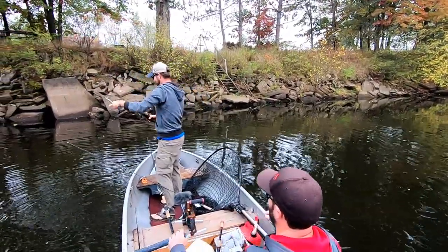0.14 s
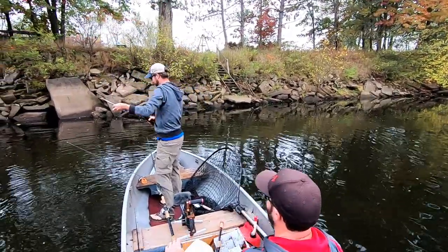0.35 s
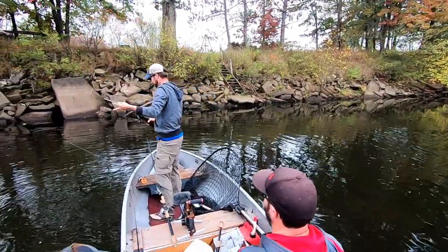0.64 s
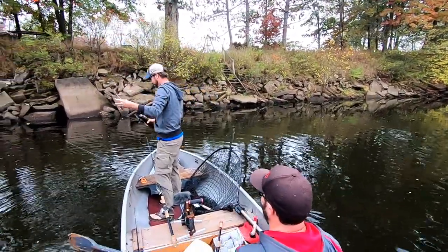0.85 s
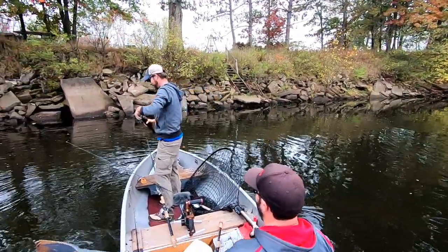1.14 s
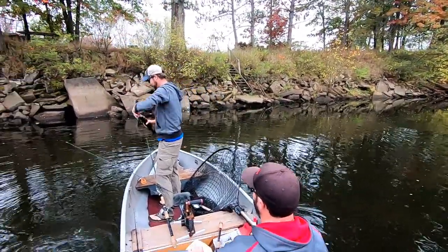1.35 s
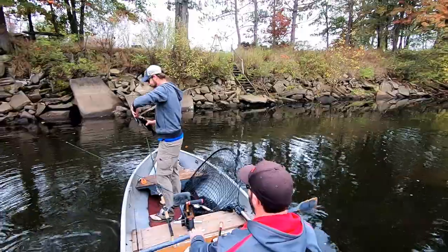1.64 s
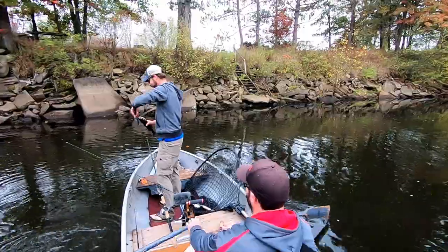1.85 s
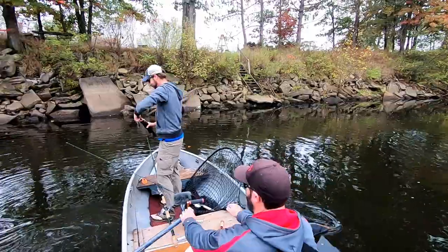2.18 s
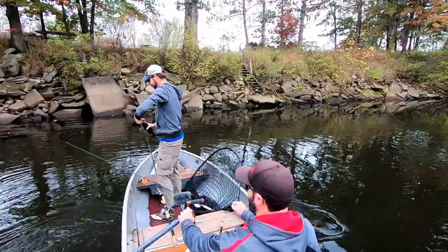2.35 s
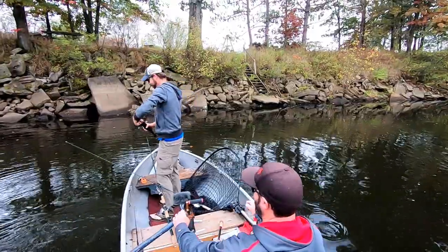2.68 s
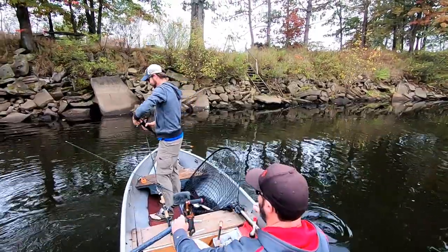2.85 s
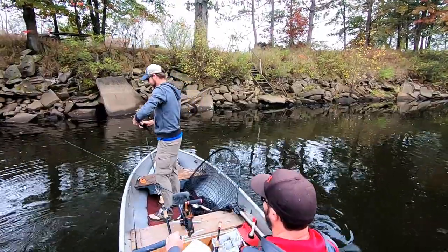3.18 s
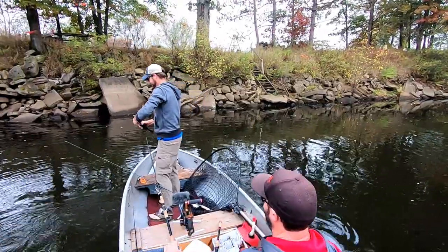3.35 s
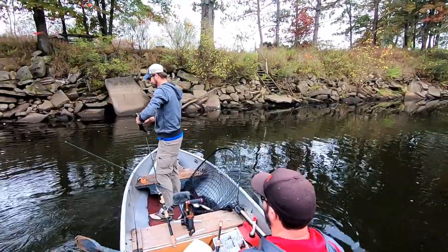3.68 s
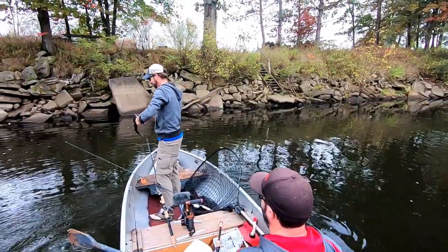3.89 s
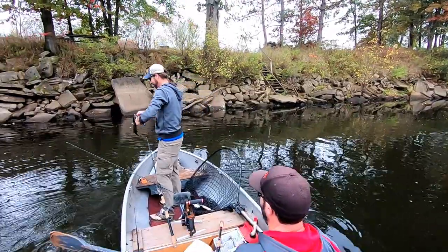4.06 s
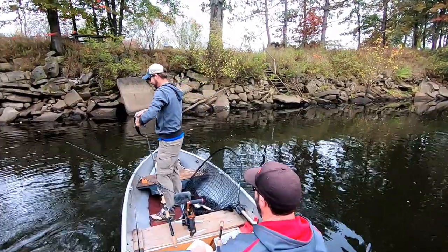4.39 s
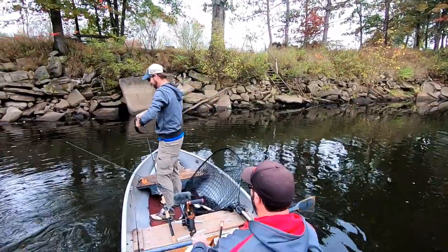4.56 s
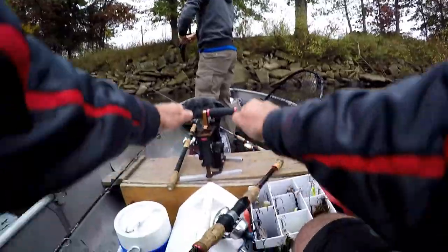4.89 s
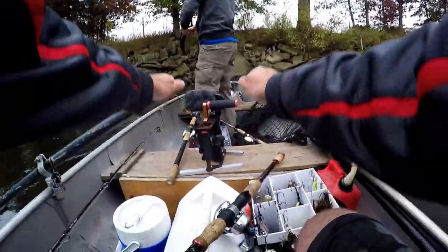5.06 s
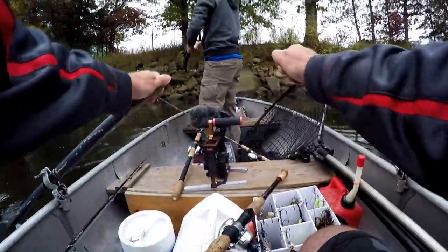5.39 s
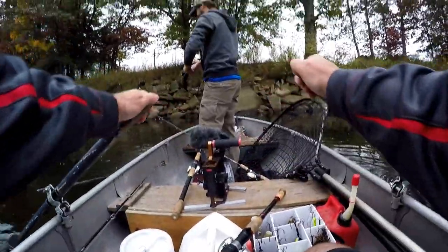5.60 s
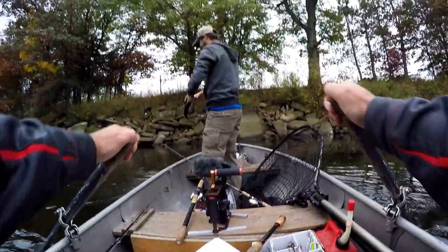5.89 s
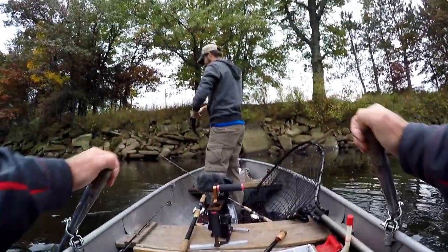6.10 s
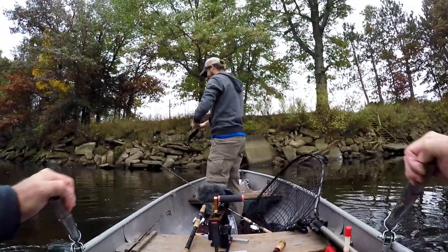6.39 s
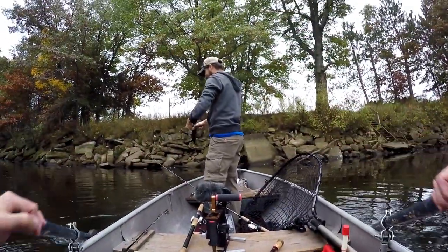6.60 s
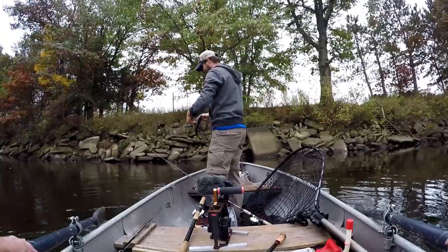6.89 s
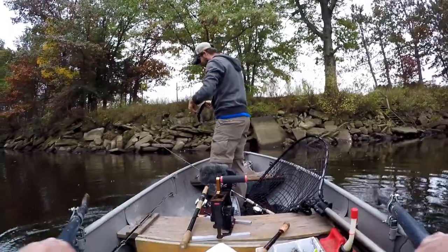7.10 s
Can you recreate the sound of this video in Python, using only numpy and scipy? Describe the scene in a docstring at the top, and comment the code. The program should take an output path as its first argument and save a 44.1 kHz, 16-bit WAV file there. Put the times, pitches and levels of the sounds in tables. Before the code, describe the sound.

A small aluminum boat is rowed on a calm river, heard close from the rower's seat with faint scatter from the bank. Low buffeting air, soft hiss and water murmur run throughout. A few watery plops lead to the first oar entry at 0.4 s, with a light splash and a cluster of hollow hull knocks that thins by 1.7 s. A jacket brushes near 2.0 and 2.4 s as thumps gather; a very loud metallic bang lands at 2.6 s, then the blades lift in quick sloshes and drip around 3 s. The second stroke splashes in at 3.4 s with knocks and chatter. Sleeves slide from 4.7 s; a strong knock at 4.9 s precedes sharp ticks and a tiny rough oarlock squeak at 5.35 s. Blades lift at 5.5 s, a thump hits at 5.7 s, drips fall around 6 s, and the third stroke enters at 6.4 s amid rustling and knocks until 7.2 s.

```python
"""A small aluminum boat is rowed on a calm river, heard from the rower's seat.
Filtered noise gives low air rumble, hiss and water murmur throughout; gliding sines drip off the blades.
At about 0.4, 3.4 and 6.4 s the blades splash in; decaying hull modes and noise make the knocks and thumps.
Noise ticks of spray and metal join in; from 2 s gated noise brushes like a jacket, and sleeves slide from 4.7 s.
The blades lift with a run of sloshes near 2.7 and 5.5 s; an oarlock squeaks in rough tones at 5.3 s."""
import sys
import numpy as np
from scipy import signal
from scipy.fft import rfft, irfft, next_fast_len
from scipy.io import wavfile
from scipy.ndimage import map_coordinates

SR = 44100
rng = np.random.default_rng(int(sys.argv[2]) if len(sys.argv) > 2 else 0)


def to_wav(s):
    """Save 16-bit WAV."""
    ch = np.atleast_2d(s).T  # columns
    pcm = np.round(np.clip(ch, -1, 1) * 32767)  # PCM
    wavfile.write(sys.argv[1], SR, pcm.astype(np.int16))


N = 319284

# Oar strokes. Each row: blades enter in seconds, time until they lift clear in seconds,
# then trims in dB for the splash, the heave on the pull and the heave on the swing.
STROKE_ROWS = [(0.42, 2.29, -6.5, -0.5, 1), (3.40, 2.14, 0.5, 0.5, -3), (6.40, 2.2, 0.5, -5, 0)]
# Hiss of the open river. Each row: time in seconds, level in dB before the hiss trim.
HISS_LEVEL = [(0.0, -68.5), (1.15, -69.5), (1.4, -67), (2.0, -65.5), (2.25, -69.5), (2.95, -66),
              (3.65, -65.5), (4.0, -71), (4.3, -70), (4.94, -64.5), (5.5, -70), (6.6, -66.5), (6.92, -71),
              (7.24, -66)]
# Colour of the hiss. Each row: frequency in Hz, relative density in dB per Hz.
HISS_COLOUR = [(180, 1.5), (300, 4.5), (384, 4), (453, -7.5), (794, -18.5), (985, -31), (1200, -7),
               (1700, -6.5), (2790, -8.5), (3450, -8), (4800, -7.5), (14000, -20.5), (15500, -24.5)]
# Colour of the low buffeting air. Each row: frequency in Hz, relative density in dB per Hz.
RUMBLE_COLOUR = [(10, -10.5), (28, 1.5), (45, -5), (75, -12), (150, -33.5), (400, -76)]
# Colour of water murmuring on the hull. Each row: frequency in Hz, relative density in dB per Hz.
MURMUR_COLOUR = [(40, 2.5), (75, 4), (115, 9.5), (190, -7), (240, -5), (310, -2.5), (450, -13.5),
                 (900, -55.5)]
# Colour of washing water and slaps. Each row: frequency in Hz, relative density in dB per Hz.
WASH_COLOUR = [(200, -20), (380, -9), (520, 6), (900, 10), (1500, 3), (2200, -2.5), (3500, -26),
               (8000, -39)]
# Colour of fine spray and ticks. Each row: frequency in Hz, relative density in dB per Hz.
SPRAY_COLOUR = [(800, -7), (2000, 0.5), (3200, 9), (5000, 5.5), (8000, -8), (15000, -17)]
# Loudest drops and plops off the blades. Each row: start in seconds, level in dB before trims,
# start pitch in Hz, glide in octaves per second, 60 dB decay in seconds.
DROP_ROWS = [(0.118, -39, 1700, 26, 0.029), (.192, -44.5, 658, 23, 0.075), (0.213, -42, 980, 1.5, 0.056),
             (0.278, -36.5, 1174, 43, 0.03), (.305, -39, 967, 20.5, 0.079), (0.702, -34, 1340, 10, 0.027),
             (.753, -39.5, 1740, 15, 0.028), (2.099, -30.5, 847, 21, 0.029), (2.135, -38, 582, -11, 0.15),
             (2.62, -28, 1043, -8, 0.053), (3.043, -29, 1214, -17, 0.034), (3.086, -38.5, 1490, 3, 0.04),
             (3.134, -41, 987, 1.5, 0.076), (3.363, -30.5, 1035, 53.5, 0.045),
             (3.91, -41.5, 1480, -12.5, 0.06), (5.783, -41.5, 1350, 41.5, 0.056),
             (5.200, -36.5, 548, -13, 0.19), (5.299, -38, 1350, -3, 0.021), (5.976, -28, 1085, 26, 0.027),
             (6.011, -36.5, 1263, 15, 0.048), (6.030, -39, 880, 23.5, 0.058), (6.145, -35, 1095, 22, 0.053),
             (6.421, -36, 1820, 19, 0.026)]
# Clear blows on the hull. Each row: start in seconds, knock, thump and clack levels in dB before trims,
# favoured pitch in Hz, number of rebounds (rounded; below one means none).
BLOW_ROWS = [(0.41, -42, -45, -47, 283, 0), (0.427, -33, -35.5, -45, 408, 0),
             (0.434, -28.5, -42, -46.5, 560, 1), (0.485, -30, -35.5, -47.5, 230, 0),
             (0.546, -30, -34, -53, 423, 0), (0.673, -39.5, -44, -66, 318, 0),
             (0.797, -34, -49, -56.5, 306, 0), (0.891, -36, -42.5, -56, 301, 0),
             (1.011, -28.5, -35, -47, 286, 0), (1.304, -44, -48.5, -49.5, 330, 0),
             (1.365, -40.5, -61, -52.5, 310, 0), (1.622, -44, -47.5, -81, 283, 0),
             (1.668, -38, -46.5, -65, 284, 0.5), (2.139, -35, -51, -57.5, 511, 1),
             (2.248, -34.5, -38, -66, 296, 0), (2.327, -38, -32, -64, 308, 0),
             (2.389, -26.5, -28, -59.5, 338, 0), (2.434, -41, -33, -61, 380, 0),
             (2.462, -39, -27, -63, 288, 0), (2.625, -12, -17.5, -30.5, 280, 0),
             (2.633, -17.5, -22, -37, 560, 0), (2.655, -31, -30.5, -71, 296, 0),
             (3.258, -38.5, -74, -58, 342, 0), (3.334, -36, -46, -52.5, 350, 0),
             (3.369, -25.5, -26.5, -51, 287, 0), (3.423, -27.5, -38, -42.5, 374, 3),
             (3.605, -33, -39.5, -52.5, 326, 0), (3.72, -41, -38.5, -53, 290, 0),
             (3.793, -38, -44, -56, 296, 0), (3.938, -37, -33.5, -54.5, 280, 0),
             (3.986, -39.5, -44, -56.5, 342, 0), (4.234, -32.5, -39, -79, 300, 0),
             (4.307, -39, -50, -50.5, 304, 0), (4.706, -24, -35.5, -54, 318, 0),
             (4.851, -38.5, -45.5, -63, 310, 0), (4.945, -19.5, -28, -39.5, 280, 0),
             (5.002, -26.5, -41.5, -48, 283, 2), (5.161, -29, -41, -52.5, 314, 1),
             (5.2, -27.5, -48, -56, 328, 0), (5.423, -37.5, -28.5, -63, 291, 0),
             (5.523, -30.5, -33, -42, 570, 1), (5.574, -30, -36, -49.5, 310, -1),
             (5.668, -34.5, -60, -52, 520, 1), (5.738, -21.5, -28, -45, 277, 0.5),
             (6.375, -37.5, -43.5, -59, 285, 0), (6.409, -32.5, -39.5, -56, 293, 0),
             (6.433, -30, -61, -53, 360, 0), (6.61, -30.5, -38.5, -49.5, 314, 0),
             (6.784, -43, -50, -49, 361, 0), (6.812, -30, -41.5, -51.5, 312, 0),
             (6.909, -31.5, -42.5, -54.5, 292, 0), (7.064, -31.5, -55, -49, 339, 0),
             (7.091, -28.5, -39, -41.5, 360, 0.5), (7.23, -21.5, -37, -46.5, 323, 0)]
# Light tap of a loaded oar. Its single row: knock, thump and clack levels in dB before trims,
# favoured pitch in Hz.
OAR_TAP = (-41.5, -49.5, -54.5, 318)
# Ringing modes of the hull. Each row: frequency in Hz, relative level in dB, 60 dB decay in seconds.
HULL_MODES = [(80.6, -8.5, 0.23), (96.3, -3, 0.17), (126.2, 4.5, 0.097), (169.2, -8, 0.082),
              (240.2, -1, 0.095), (305, 5, 0.093), (341.2, 0, 0.12), (389.3, -7, 0.11),
              (449.3, -13.5, 0.26), (508.7, -8.5, 0.15), (582, -10, 0.06), (674.5, -8.5, 0.11),
              (780.5, -10, 0.22), (913, -9.5, 0.088), (989, -19.5, 0.16), (1239, -7, 0.062),
              (1340, -12, 0.08), (2010, -31, 0.01), (2570, -11, 0.029)]
# Dense ring of panels and loose gear. Each row: frequency in Hz, relative density in dB per Hz.
PANEL_COLOUR = [(40, -6), (85, -4), (140, 8.5), (200, -8), (300, 2.5), (430, -16), (700, 0), (1300, -4.5),
                (1900, -8.5), (2700, -19), (4500, -21), (7000, -25), (15000, -74)]
# How long that dense ring lasts. Each row: frequency in Hz, 60 dB decay in seconds.
PANEL_T60 = [(100, 0.026), (400, 0.26), (1200, 0.092), (2500, 0.064), (8000, 0.069)]
# Sharp ticks of spray and oarlock metal. Each row: start in seconds, envelope peak in dB before the trim,
# 60 dB decay in seconds.
TICK_ROWS = [(0.7168, -37.5, 0.018), (0.8195, -41.5, 0.054), (1.011, -41, 0.021), (1.304, -42.5, 0.076),
             (1.5506, -40, 0.014), (2.2651, -32.5, 0.015), (2.4026, -36, 0.03), (4.916, -28, 0.0076),
             (5.1472, -27.5, 0.0056), (5.1724, -36, 0.034), (5.225, -34.5, 0.014), (5.3458, -30.5, 0.013),
             (5.3565, -34.5, 0.031), (5.454, -37.5, 0.014), (5.5225, -34.5, 0.048), (6.0142, -38, 0.01),
             (6.125, -39, 0.013)]
# Brisk brushes of the jacket. Each row: start in seconds, envelope peak in dB before the trim,
# 60 dB decay in seconds.
BRUSH_ROWS = [(2.0038, -41.5, 0.06), (2.431, -30.5, 0.084), (4.7124, -44.5, 0.057), (5.705, -45, 0.061),
              (5.7367, -44.5, 0.079), (5.9299, -39.5, 0.03), (6.1458, -40.5, 0.1), (6.3841, -31.5, 0.022),
              (6.5076, -37.5, 0.11), (6.63, -50, 0.11), (6.7206, -37, 0.017), (6.78, -34, 0.02),
              (7.0858, -35, 0.055)]
# Sliding sleeves. Each row: time in seconds, rustle level in dB before the trim.
SLEEVE_LEVEL = [(4.66, -68), (4.72, -54.5), (5.05, -72), (5.17, -62), (5.45, -77), (5.67, -83), (5.7, -45),
                (5.82, -60), (6.45, -57.5), (6.52, -53.5), (6.7, -52), (7.0, -66), (7.24, -51)]
# Colour of the jacket close by. Each row: frequency in Hz, relative density in dB per Hz.
CLOTH_COLOUR = [(1500, -8), (2800, 1), (3700, -24), (4600, 14), (5500, -24), (8500, -16), (12000, 7),
                (15500, -25)]
# Resonances that colour the rustle. Each row: centre in Hz, width in Hz, relative level in dB.
CLOTH_RINGS = [(3860, 87, 7.5), (4270, 460, 6.5), (6400, 130, 6.5), (7150, 300, 8.5), (6870, 300, 9.5),
               (10700, 470, -2.5), (13400, 720, -4)]
# Short oarlock squeaks. Each row: start in seconds, fundamental's level in dB, start pitch in Hz,
# glide of the fundamental in octaves per second, 60 dB decay in seconds.
SQUEAK_ROWS = [(5.343, -31, 2500, -1, 0.019), (5.373, -33, 1500, -7.5, 0.055)]

TIME = np.arange(N) / SR
AGE = np.arange(SR // 2) / SR  # seconds since a sound began, up to half a second


def amp(db):
    """Decibels to gain."""
    return 10 ** (np.asarray(db) / 20)


def unit(x):
    """Scale to rms 1."""
    return x / np.sqrt(np.mean(x ** 2) + 1e-20)


def fade(t, t60):
    """Exponential decay, 60 dB down after t60 seconds."""
    return np.exp(-np.log(1000) * t / np.maximum(t60, 1e-3))


def along(points, hz):
    """Read (Hz, value) points on a log frequency axis."""
    f, v = np.transpose(points)
    return np.interp(np.log(hz + 1), np.log(f + 1), v)


def curve(points):
    """Straight lines through (seconds, value) points, one value per sample."""
    s, v = np.transpose(points)
    return np.interp(TIME, s, v)


def wobble(rate):
    """A smooth random curve with rate knots a second."""
    knots = rng.standard_normal(int(N * rate / SR) + 4)
    return map_coordinates(knots, [TIME * rate])


def noise(spectrum, size=N):
    """White noise shaped by a (Hz, dB) spectrum, at rms 1."""
    m = next_fast_len(size + 2048)
    gain = amp(along(spectrum, np.fft.rfftfreq(m, 1 / SR)))
    return unit(irfft(rfft(rng.standard_normal(size), m) * gain, m)[:size])


def band(x, hz, kind, order=3):
    """Causal Butterworth filter."""
    return signal.sosfilt(signal.butter(order, hz, kind, fs=SR, output="sos"), x)


def add(track, s, sound):
    """Mix a sound into the track at s seconds."""
    start = max(round(s * SR), 0)
    part = track[start:start + len(sound)]
    part += sound[:len(part)]


def scattered(start, span, count):
    """Irregular times that fill a span, one in each equal part of it."""
    return start + span * (np.arange(count) + rng.uniform(size=count)) / count


def swells(rows, rise):
    """The envelope of short puffs that rise and die away."""
    out = np.zeros(N)
    for s, db, t60 in rows:
        shape = fade(AGE, t60) * (1 - np.exp(-AGE / rise))
        add(out, s, amp(db) * shape / shape.max())
    return out


def stroke_swell(level_db, delay, hold, rise_db_per_s, fall_db_per_s):
    """A gain that rises, holds and falls with each stroke; delay counts from the blades' entry."""
    out = np.zeros(N)
    for (catch, *_), db in zip(STROKE_ROWS, level_db):
        t = TIME - catch - delay
        rising = rise_db_per_s * np.maximum(-t, 0)
        falling = fall_db_per_s * np.maximum(t - hold, 0)
        out += amp(db - rising - falling)
    return out


def snags(count, size_db, t60):
    """A crackly gain of rms 1: tiny snaps of very uneven size at random moments."""
    sizes = amp(size_db * np.clip(rng.standard_normal(count), -2, 2))
    snaps = np.bincount(rng.integers(N, size=count), sizes, N)
    shape = fade(AGE, t60) * (1 - np.exp(-AGE / 0.0005))
    return unit(signal.fftconvolve(snaps, shape)[:N])


def surroundings(x, near_db, bank_db, near_t60, bank_t60=1.0):
    """Reflections between hull and water and scatter from the rocky bank: noise tails cut at half a second."""
    near, bank = rng.standard_normal((2, len(AGE))) * fade(AGE, np.array([[near_t60], [bank_t60]]))
    tail = amp(near_db) * near / np.linalg.norm(near) + amp(bank_db) * bank / np.linalg.norm(bank)
    return x + signal.fftconvolve(x, tail)[:N]


def air(still_db=-58, pull_db=-51, swing_db=-48, hiss_db=6.0):
    """Low buffeting noise that grows as the boat heaves with each pull and swing, under the river's hiss."""
    pull_heave_db, swing_heave_db = np.transpose(STROKE_ROWS)[3:]
    pull = stroke_swell(pull_db + pull_heave_db, delay=0, hold=.14, rise_db_per_s=50, fall_db_per_s=11.5)
    swing = stroke_swell(swing_db + swing_heave_db, delay=2.23, hold=0.071, rise_db_per_s=48, fall_db_per_s=45)
    buffet = (amp(still_db) + pull + swing) * amp(0.55 * wobble(5))  # wavers by a fraction of a dB
    return buffet * noise(RUMBLE_COLOUR) + amp(curve(HISS_LEVEL) + hiss_db) * noise(HISS_COLOUR)


def murmur(calm_db=-62, pull_db=-48, eddy_db=-46):
    """Water murmurs on the hull as the pull begins and as the blades eddy at its end: swelling low noise."""
    heave_db = np.transpose(STROKE_ROWS)[3]
    pull = stroke_swell(pull_db + heave_db, delay=0.092, hold=0.028, rise_db_per_s=150, fall_db_per_s=19.5)
    eddy = stroke_swell(eddy_db + heave_db, delay=1.817, hold=0.56, rise_db_per_s=68, fall_db_per_s=150)
    return (amp(calm_db) + pull + eddy) * noise(MURMUR_COLOUR)


def bubble(hz, glide, t60):
    """A trapped bubble rings; its pitch slides for a moment as it moves under the surface."""
    onset, longest_glide = .0015, .03  # seconds
    t = AGE[:SR // 8]
    pitch = hz * 2 ** (glide * np.minimum(t, longest_glide))
    tone = np.sin(2 * np.pi * np.cumsum(pitch) / SR)
    return tone * fade(t, t60) * (1 - np.exp(-t / onset))


def bubbling(count=2200, middle_hz=950, scatter=0.425, size_db=3.5, wash_db=-5):
    """Stirred water of rms 1: a crowd of small bubbles on a soft wash of noise."""
    fizz = np.zeros(N)
    for when in rng.uniform(0, N / SR, count):
        pitch, size, glide = rng.standard_normal(3)
        hz = middle_hz * np.exp(scatter * np.clip(pitch, -2, 1.6))
        # each bubble dies in 42 cycles, so small high ones are brief
        add(fizz, when, amp(size_db * min(size, 2)) * bubble(hz, 5 + 10 * glide, 42 / hz))
    return unit(unit(fizz) + amp(wash_db) * noise(WASH_COLOUR))


def sloshes(entry_db=-38, entry_delay=0.0335, entry_t60=0.15, lift_db=-40.5, lift_span=.19, lift_t60=0.11):
    """Slosh rows (start s, relative peak dB, t60 s): one as the blades enter, a quick run as they lift."""
    rows = []
    for catch, length, splash_db, *_ in STROKE_ROWS:
        rows.append((catch + entry_delay, entry_db + splash_db, entry_t60))
        rows += [(s, lift_db, lift_t60) for s in scattered(catch + length, lift_span, count=8)]
    return rows


def trickle(calm_db=-68, swing_db=-60.5, entry_db=-58, slosh_db=-10, fizz_db=-9):
    """Water runs off the swinging blades and is stirred as they enter; fine droplets tick above it."""
    splash_db = np.transpose(STROKE_ROWS)[2]
    run_off = stroke_swell(swing_db + splash_db, delay=-0.42, hold=0.28, rise_db_per_s=27, fall_db_per_s=67)
    entry = stroke_swell(entry_db + splash_db, delay=.04, hold=0.19, rise_db_per_s=150, fall_db_per_s=42)
    stir = run_off + entry
    flow = amp(calm_db) + stir + amp(slosh_db) * swells(sloshes(), rise=0.0023)
    droplets = stir * snags(count=350, size_db=7, t60=.014) * noise(SPRAY_COLOUR)
    return flow * bubbling() + amp(fizz_db) * droplets


def drips(lead_s=.42, span_s=.29, level_db=-45, middle_hz=897, middle_glide=17, cycles=56,
          spread_db=2, spread_octaves=0.403, glide_spread=8):
    """Drop rows for lesser drips off the raised blades before each stroke; higher ones die sooner."""
    rows = []
    for catch, *_ in STROKE_ROWS:
        for s in scattered(catch - lead_s, span_s, count=9):
            size, pitch, glide = np.clip(rng.standard_normal(3), -2, 2)
            hz = middle_hz * 2 ** (spread_octaves * pitch)
            octaves_per_s = middle_glide + glide_spread * glide
            rows.append((s, level_db + spread_db * size, hz, octaves_per_s, cycles / hz))
    return rows


def drops(level_db=0, slap_db=-14, slap_t60=0.039):
    """Single drops: a small noise slap on the water and a ringing bubble."""
    out = np.zeros(N)
    for s, db, hz, glide, t60 in DROP_ROWS + drips():
        add(out, s, amp(db + level_db) * bubble(hz, glide, t60))
        slap = noise(WASH_COLOUR, size=SR // 8) * fade(AGE[:SR // 8], slap_t60)
        add(out, s, amp(db + slap_db) * slap)
    return out


def blows(rebound_s=.017, rebound_loss_db=2.5, catch_delay=.02, pull_s=.55,
          tap_spread_db=2, easing_db_per_s=10):
    """Every hull contact: clear blows, oars chattering in their locks, and weakening taps of each pull."""
    rows = []
    for s, *levels, pitch, rebounds in BLOW_ROWS:
        rows.append((s, *levels, pitch))
        for k in range(1, round(rebounds) + 1):
            late = rebound_s * (k + rng.uniform(-0.2466, 0.261))
            rows.append((s + late, *(np.array(levels) - rebound_loss_db * k), pitch))
    for catch, *_ in STROKE_ROWS:
        for late in scattered(catch_delay, pull_s, count=5):
            change_db = tap_spread_db * rng.standard_normal() - easing_db_per_s * late
            rows.append((catch + late, *(np.array(OAR_TAP[:3]) + change_db), OAR_TAP[3]))
    return rows


def punch(x):
    """Scale a blow so that its first 20 ms have rms 1."""
    return x / np.sqrt(np.mean(x[:SR // 50] ** 2) + 1e-20)


def panels(lo, hi):
    """Countless close modes between lo and hi Hz: noise that dies at a different rate in each band."""
    hz, t, z = signal.stft(noise(PANEL_COLOUR, size=len(AGE)), SR, nperseg=1024)
    inside = (hz >= lo) & (hz < hi)
    gain = fade(t, along(PANEL_T60, hz)[:, None]) * inside[:, None]
    return signal.istft(z * gain, SR, nperseg=1024)[1][:len(AGE)]


def register(shares, lo, hi, panel_db, contact):
    """The hull's modes and panels between lo and hi Hz; the ring builds up over the time of contact."""
    hz, _, t60 = np.transpose(HULL_MODES)
    inside = (hz >= lo) & (hz < hi)
    tones = np.sin(2 * np.pi * hz[inside, None] * AGE) * fade(AGE, t60[inside, None])
    ring = punch(shares[inside] @ tones) + amp(panel_db) * punch(panels(lo, hi))
    return punch(ring * (1 - np.exp(-AGE / contact)))


def knocks(thump_db=-2, knock_db=-9, clack_db=1, spread_db=2, focus_db=6,
           middle_blow_db=-46, middle_corner_hz=1700, octave_db=11):
    """Each blow rings the hull in a low thump, a middle knock and a high clack, each at its own level."""
    out = np.zeros(N)
    low_hz, high_hz = 200, 600  # borders between thump, knock and clack
    hz, mode_db, _ = np.transpose(HULL_MODES)
    for s, knock, thump, clack, pitch in blows():
        # the place of the blow favours the modes near one pitch and sets their signs
        favour = -focus_db * np.abs(np.log2(np.clip(hz, low_hz, high_hz) / pitch))
        signs = rng.choice([-1, 1], len(hz))
        shares = signs * amp(mode_db + favour + spread_db * rng.standard_normal(len(hz)))
        low = register(shares, 0, low_hz, panel_db=-13.0, contact=0.0027)
        middle = register(shares, low_hz, high_hz, panel_db=-7.5, contact=0.0016)
        high = register(shares, high_hz, SR, panel_db=1.5, contact=0.0002)
        # a harder clack reaches higher: its corner rises an octave every octave_db
        corner = np.clip(middle_corner_hz * 2 ** ((clack - middle_blow_db) / octave_db), high_hz, SR / 4)
        add(out, s, amp(thump + thump_db) * low)
        add(out, s, amp(knock + knock_db) * middle)
        add(out, s, amp(clack + clack_db) * punch(band(high, corner, "low", order=1)))
    return out


def ticks(level_db=-10.0, rough_db=4.2, rough_rate=300):
    """Sharp ticks of spray and oarlock metal: quick bursts of bright noise with a rough gain."""
    rough = unit(amp(rough_db * np.tanh(wobble(rough_rate))))
    return amp(level_db) * swells(TICK_ROWS, rise=0.00028) * noise(SPRAY_COLOUR) * rough


def jacket(rustle_db=-2, brush_db=-7.5, broad_db=-3, slip_db=4.0, own_db=8.5, catch_rate=200, snag_db=2):
    """Sleeves slide and brush; the weave catches and slips, its resonances flickering separately."""
    weave = amp(broad_db) * noise(CLOTH_COLOUR)
    for hz, width, db in CLOTH_RINGS:
        ring = band(rng.standard_normal(N), [hz - width / 2, hz + width / 2], "band", order=1)
        weave += amp(db) * unit(ring * amp(own_db * np.tanh(wobble(catch_rate))))
    # the cloth tends to be either caught or sliding
    grip = unit(amp(slip_db * np.tanh(2 * wobble(catch_rate) - 1)))
    slips = unit(grip + amp(snag_db) * snags(count=600, size_db=5.5, t60=0.0079))
    started = TIME > SLEEVE_LEVEL[0][0]
    sliding = started * amp(curve(SLEEVE_LEVEL) + rustle_db) * slips
    brushing = swells(BRUSH_ROWS, rise=0.0012)
    return unit(weave) * (sliding + amp(brush_db) * brushing)


def squeaks(overtone_loss_db=14, rough=0.28, rough_rate=600):
    """A dry oarlock gives a short, rough, gliding tone with two overtones."""
    out = np.zeros(N)
    for s, db, hz, glide, t60 in SQUEAK_ROWS:
        for k in range(3):
            # the bubble's decaying, gliding sine serves for each partial
            add(out, s, amp(db - overtone_loss_db * k) * bubble((k + 1) * hz, glide, t60))
    return out * (1 + rough * wobble(rough_rate))


def scene():
    """Air, water, hull, oarlocks and jacket in one channel."""
    plops = surroundings(drops() + squeaks(), near_db=-5.5, bank_db=-39, near_t60=0.13)
    hull = surroundings(knocks(), near_db=-22, bank_db=-24, near_t60=.15)
    mix = air() + murmur() + trickle() + plops + hull + ticks() + jacket()
    return mix[None]


def record(dry, top_hz=15500):
    """Cut everything from top_hz upward with a steep spectral edge."""
    m = next_fast_len(N + SR // 2)
    kept = np.fft.rfftfreq(m, 1 / SR) < top_hz
    return irfft(rfft(dry, m) * kept, m)[..., :N]


dry = scene()
out = record(dry)
to_wav(out)
```